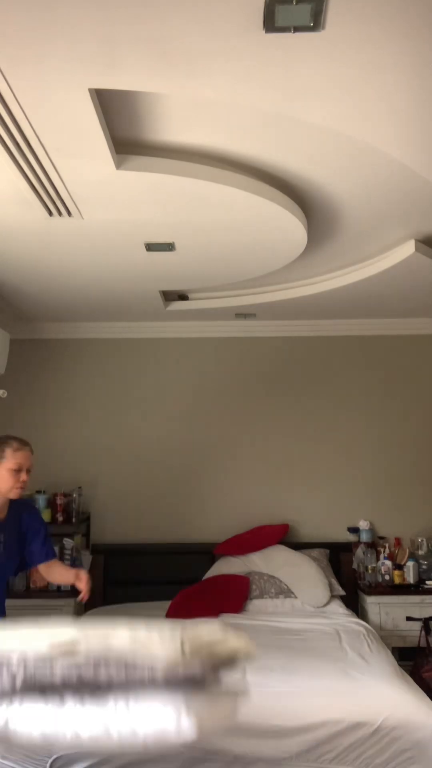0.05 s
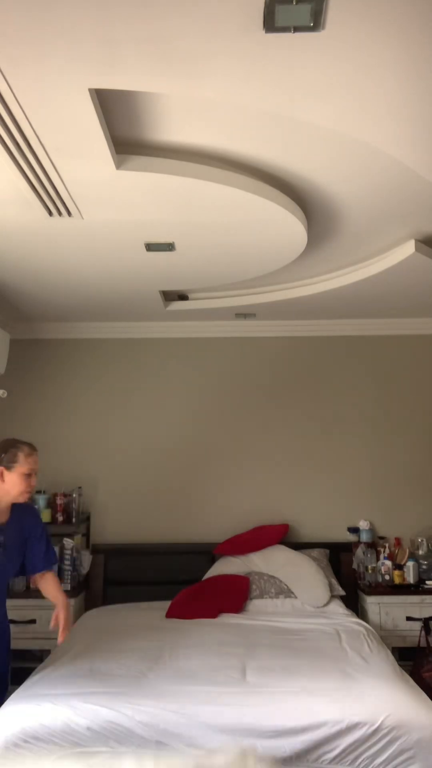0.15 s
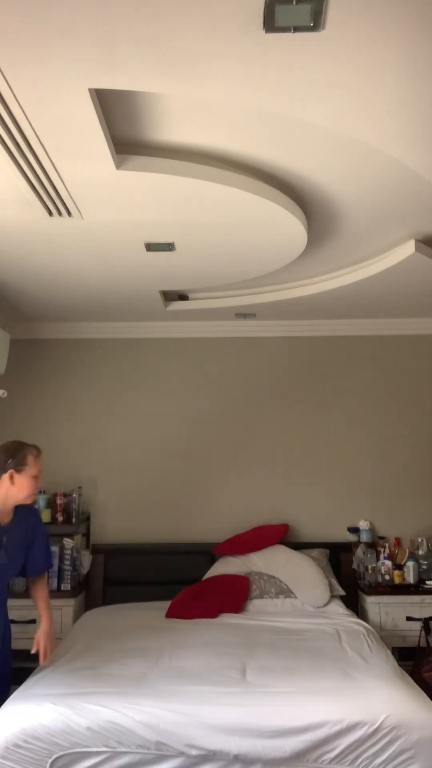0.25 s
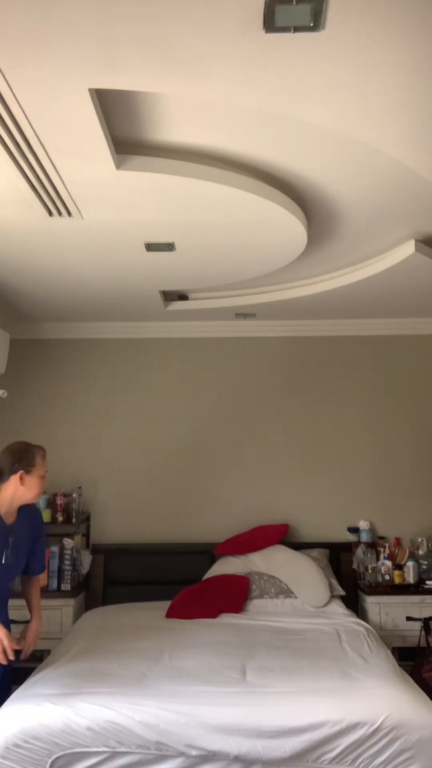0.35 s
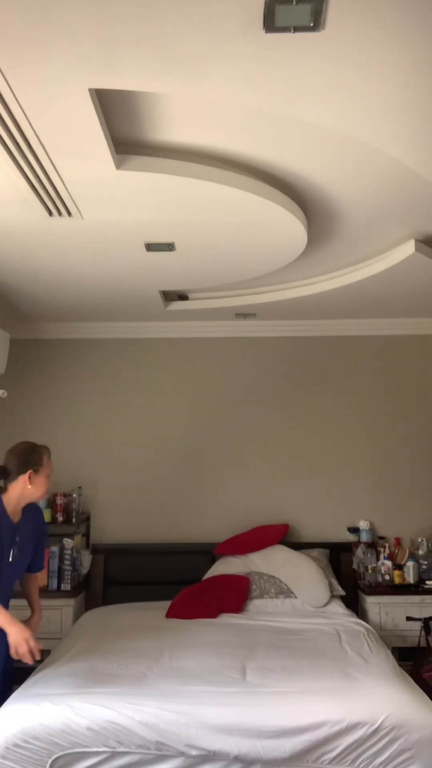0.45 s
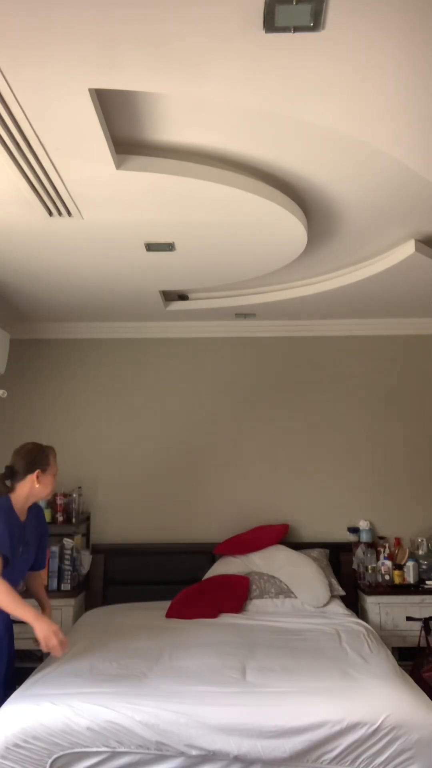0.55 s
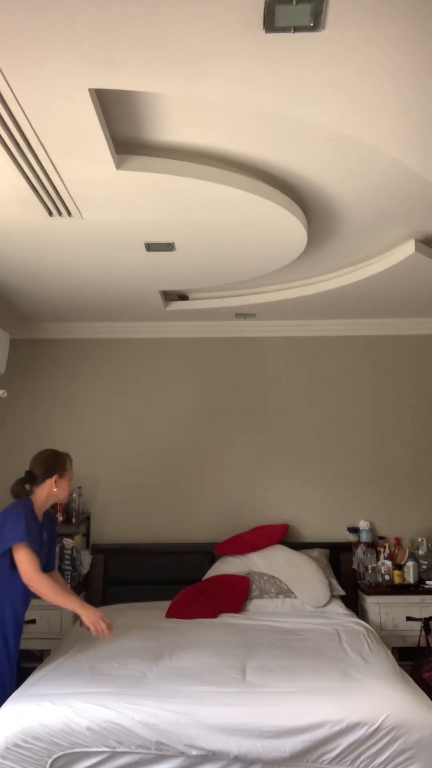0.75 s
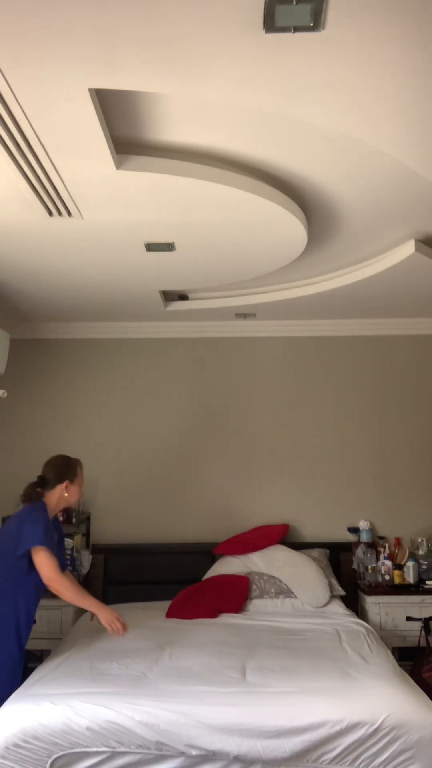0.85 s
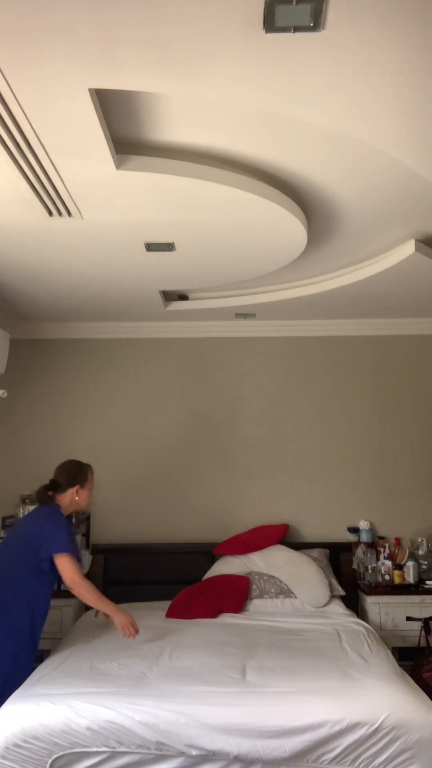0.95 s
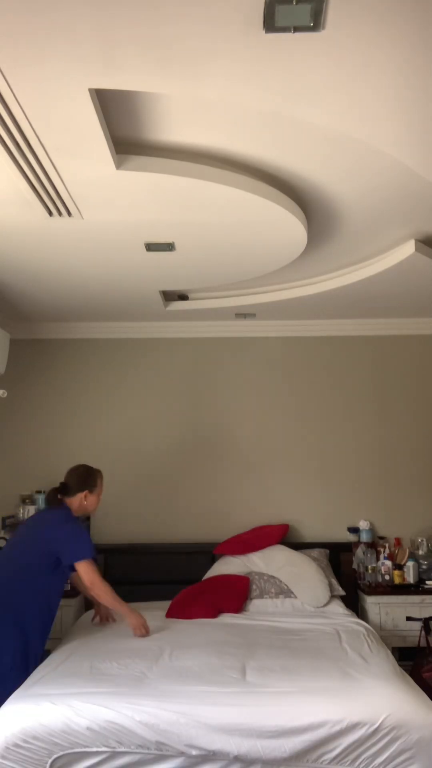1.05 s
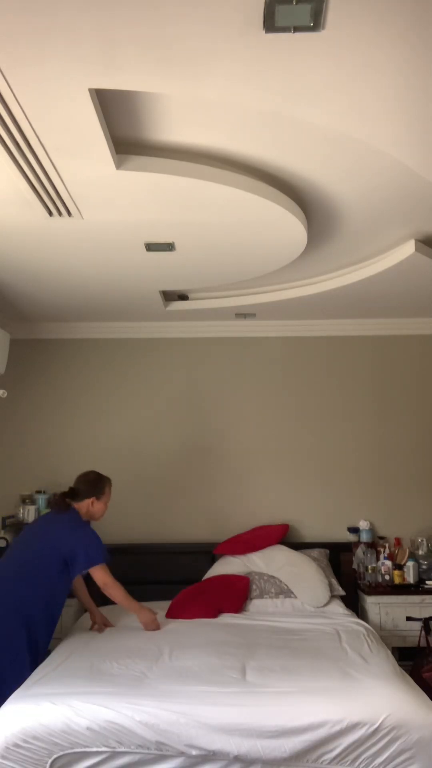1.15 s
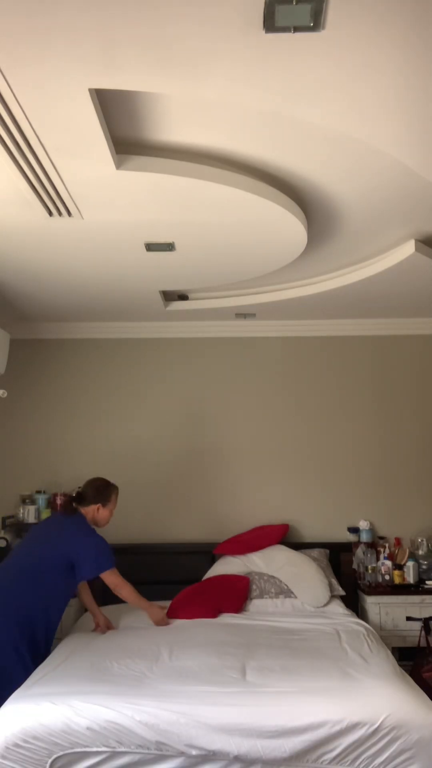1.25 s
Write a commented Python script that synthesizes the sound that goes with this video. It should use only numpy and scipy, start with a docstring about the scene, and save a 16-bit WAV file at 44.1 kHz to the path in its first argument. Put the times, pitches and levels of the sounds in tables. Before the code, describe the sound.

Bedding flops onto a mattress with a muffled, briefly booming thump in a quiet bedroom. The bed frame knocks faintly, then a hand slides over the sheet with a soft hiss, above a low ventilation hum.

```python
"""Faint mains hum and ventilation fill a quiet bedroom as a stack of folded bedding swishes through the air.
It flops onto a bed layer by layer: each impact excites the modes of bed base and mattress and
puffs air out through the cloth, and the room booms briefly. The bedding slumps; the frame knocks softly.
Then a hand sweeps over the sheet with a hiss of friction, and the weave zips lower as the hand slows."""
import sys
import numpy as np
from scipy import signal
from scipy.fft import rfft, irfft, next_fast_len
from scipy.io import wavfile
from scipy.ndimage import map_coordinates

SR = 44100
rng = np.random.default_rng(int(sys.argv[2]) if len(sys.argv) > 2 else 0)


def materialize(psi):
    """Save the field psi as 16-bit PCM at rate SR to the path in sys.argv[1].

    A 1-D psi becomes a single channel; in a 2-D psi each row is a channel.
    """
    bounded = np.clip(np.atleast_2d(psi).T, -1, 1)
    quanta = np.round(bounded * 32767).astype(np.int16)
    wavfile.write(sys.argv[1], SR, quanta)


N = 57330

# layers of the stack landing: start_s, push_db, puff_db, puff_rise_s
LANDINGS = [(0.2089, -32, -29, 0.0037), (0.2199, -26.5, -32.5, 0.016), (0.2439, -31.5, -30.5, 0.011),
            (0.2637, -22, -26.5, 0.0036), (0.2834, -28.5, -35, 0.018)]
LANDING_PAN_DB = -2.5  # left minus right


def amp(db):
    """Amplitude ratio of a level in decibels."""
    return 10 ** (np.asarray(db) / 20)


def unit(x):
    """Normalisation to rms 1."""
    return x / np.sqrt(np.mean(x ** 2) + 1e-20)


def pan(db):
    """Interchannel level difference as left and right gains."""
    return amp(np.array([[.5], [-.5]]) * db)


def along(points, hz):
    """Interpolation of (frequency_hz, value) points on a log frequency axis."""
    knots_hz, values = np.transpose(points)
    return np.interp(np.log(hz + 1), np.log(knots_hz + 1), values)


def since(start_s):
    """Elapsed seconds at each sample, zero before the start."""
    return np.maximum(np.arange(N) / SR - start_s, 0)


def curves(rows):
    """Linear interpolation in time of each column after the first."""
    times, *columns = np.transpose(rows)
    return [np.interp(since(0), times, column) for column in columns]


def wobble(knots_per_s):
    """Slow random modulation: a spline through Gaussian values."""
    return map_coordinates(rng.standard_normal(N // 8), [since(0) * knots_per_s], mode="wrap")


def filtered(x, response):
    """Linear filtering: the spectrum times a complex frequency response."""
    size = next_fast_len(N + SR // 2)
    hz = np.fft.rfftfreq(size, 1 / SR)
    return irfft(rfft(x, size) * response(hz), size)[..., :N]


def rush(spectrum):
    """Partially coherent stereo noise of rms 1, mixed from independent mid and side signals."""
    # likeness at the two microphones: frequency_hz, correlation
    coherence = [(60, 0.64), (230, 0.44), (500, .65), (1000, .65), (4000, 0.68), (8000, .7)]

    def response(hz):
        angle = np.arccos(np.clip(along(coherence, hz), -1, 1)) / 2
        return amp(along(spectrum, hz)) * [np.cos(angle), np.sin(angle)]
    mid, side = filtered(rng.standard_normal((2, N)), response)
    return unit(np.array([mid + side, mid - side]))


def cloth(spectrum, grain_db):
    """Stick-slip friction: fibres catch and release, making the noise grainy."""
    return unit(rush(spectrum) * amp(grain_db * wobble(knots_per_s=750)))


def narrowband(hz, width_hz):
    """Random quadrature modulation spreads a steady or gliding tone into a noise band of rms 1."""
    phase = 2 * np.pi * np.cumsum(hz * np.ones(N)) / SR
    return unit(wobble(width_hz) * np.cos(phase) + wobble(width_hz) * np.sin(phase))


def burst(start_s, rise_s, t60_s):
    """Transient envelope: a linear rise, then exponential decay."""
    attack = np.minimum(since(start_s) / rise_s, 1)
    return attack * np.exp(-np.log(1000) * since(start_s + rise_s) / t60_s)


def ring(start_s, hz, rise_s, t60_s):
    """Damped oscillation of one mode."""
    return burst(start_s, rise_s, t60_s) * np.sin(2 * np.pi * hz * since(start_s))


def mains_hum(waver_db=.8):
    """A motor's line spectrum, each partial wavering slightly in level."""
    # low partials: pitch_hz, level_db
    partials = [(59.2, -66.5), (97, -68), (119.6, -55)]
    # upper partials: pitch_hz, level_db
    overtones = [(237, -69), (296, -68)]
    # their swell toward the end: time_s, gain_db
    swell = [(0, -5.5), (.75, -7), (.9, 0.5), (1.3, 1)]

    def tone(hz, db):
        envelope = amp(db + waver_db * wobble(knots_per_s=6.2))
        return envelope * unit(np.sin(2 * np.pi * (hz * since(0) + rng.random())))
    low = sum(tone(hz, db) for hz, db in partials)
    high = sum(tone(hz, db) for hz, db in overtones)
    return low + amp(curves(swell)[0]) * high


def ventilation(air_db=-60):
    """Steady airflow gives broadband noise with a thin narrowband whine."""
    # bands of the whine: centre_hz, level_db, width_hz
    whine_bands = [(990, -83, 140), (1500, -89.5, 190), (2620, -89, 190), (4120, -80, 120)]
    # spectrum of the moving air: frequency_hz, relative_db
    air_spectrum = [(25, -10), (60, 1.5), (160, -7), (300, -13.5), (500, -23), (900, -33), (1800, -44.5),
                    (3300, -39.5), (4100, -30.5), (4800, -50), (6300, -42.5), (7600, -51), (11000, -43.5),
                    (13000, -75)]
    whine = sum(amp(db) * narrowband(hz, width) for hz, db, width in whine_bands)
    return whine + amp(air_db) * rush(air_spectrum)


def reverberation(x):
    """Diffuse field: convolution with a short decaying noise, different at each microphone."""
    # reverberation time of the bedroom: frequency_hz, t60_s
    decay_times = [(100, 0.77), (500, .36), (2000, 0.33), (8000, 0.46)]
    hz, t, noise = signal.stft(rng.standard_normal((2, SR // 2)), SR, nperseg=256)
    decay = np.exp(-np.log(1000) * t / along(decay_times, hz)[:, None])
    tail = signal.istft(noise * decay, SR, nperseg=256)[1]
    return signal.fftconvolve(x, tail / np.linalg.norm(tail[0]), axes=1)[:, :N]


def wall_reflections(x, count=9, span_s=0.027, level_db=-4):
    """Comb filtering: early reflections interfere with the direct sound above the bass."""
    delays = span_s * (np.arange(count) + rng.random(count)) / count
    gains = rng.choice([-1, 1], count) * np.exp(-delays / span_s)
    gains = amp(level_db) * gains / np.linalg.norm(gains)

    def response(hz):
        highpass = hz / np.hypot(hz, 400)
        echoes = gains @ np.exp(-2j * np.pi * np.outer(delays, hz))
        return (1 + highpass * echoes) / np.hypot(1, highpass * amp(level_db))
    return filtered(x, response)


def frame_knocks(rise_s=.012):
    """Shifting weight excites the bed frame's modes in faint knocks."""
    # shifts of weight: start_s, level_db
    nudges = [(0.501, -56), (.585, -62.5), (0.766, -60.5)]
    # modes of the frame: pitch_hz, gain_db, t60_s
    modes = [(61.4, 8, 0.24), (244.3, -1, 0.15), (415.5, -4, 0.054), (710, -12, 0.39)]
    return sum(amp(level + db) * ring(start, hz, rise_s, t60)
               for start, level in nudges for hz, db, t60 in modes)


def swish_and_settle():
    """Amplitude-modulated noise: air moves with the flying stack, and the bedding later slumps."""
    # the stack in flight: time_s, level_db
    swish = [(0, -64.5), (.06, -69), (.12, -74.5), (.17, -77.5), (.2, -55.5), (.23, -88.5)]
    # small soft slumps: start_s, level_db
    slumps = [(.45, -68), (0.538, -75.5), (0.766, -70)]
    # spectrum of both: frequency_hz, relative_db
    spectrum = [(150, -10), (350, 3), (700, -6.5), (1000, -10), (1550, -17), (2200, -23.5), (6000, -24.5),
                (7500, -48)]
    settling = sum(amp(db) * burst(start, rise_s=0.018, t60_s=0.42) for start, db in slumps)
    return (amp(curves(swish)[0]) + settling) * rush(spectrum)


def hand_sweep(grain_db=1.5):
    """Sliding friction hisses, then drags; the zip's pitch is the rate at which threads pass."""
    # the hand's stroke: time_s, hiss_db, drag_db
    stroke = [(.8, -100, -96), (.87, -78, -75.5), (.93, -95, -77), (.97, -75.5, -83.5),
              (1.042, -77.5, -69.5), (1.053, -57, -70), (1.115, -56, -63.5), (1.16, -64, -58.5),
              (1.21, -73.5, -60), (1.3, -71.5, -59.5)]
    # bright friction spectrum: frequency_hz, relative_db
    hiss_spectrum = [(700, -14.5), (1500, -11.5), (2100, -5.5), (2650, 5.5), (3200, -1.5), (4000, 2),
                     (6300, 6), (7000, -9.5), (7700, -22), (10000, -20), (12000, -56.5)]
    # duller friction spectrum: frequency_hz, relative_db
    drag_spectrum = [(60, 11.5), (250, 9), (500, -1), (800, -3), (1400, -6.5), (2100, -3.5), (2700, -4),
                     (3200, -5.5), (4000, -0.5), (6300, -26.5), (7300, -29), (11000, -40)]
    # threads passing under the hand: time_s, pitch_hz, level_db
    weave = [(1.1, 4400, -78), (1.135, 4300, -68), (1.17, 4850, -68), (1.205, 4400, -72),
             (1.232, 4150, -65), (1.256, 4000, -62), (1.266, 3520, -62), (1.3, 3420, -66)]
    hiss_db, drag_db = curves(stroke)
    weave_hz, weave_db = curves(weave)
    zip_started = since(weave[0][0]) > 0
    zipping = amp(weave_db) * narrowband(weave_hz, width_hz=200) * zip_started
    hiss = amp(hiss_db) * cloth(hiss_spectrum, grain_db)
    drag = amp(drag_db) * cloth(drag_spectrum, grain_db)
    return hiss + drag + zipping


def flop(grain_db=-1, t60_s=0.22):
    """Impact noise: cloth snaps and slaps on the sheet, and compression expels air from the layers."""
    # snap of the stack's leading edge: frequency_hz, relative_db
    snap_spectrum = [(400, -7), (1400, -5.5), (2700, 1), (3400, -11), (7000, -35.5), (8000, -49)]
    # air escaping through cloth: frequency_hz, relative_db
    puff_spectrum = [(30, -19), (70, 2), (150, -9), (220, 3.5), (320, -6.5), (430, -9), (680, -12.5),
                     (850, -18.5), (1400, -24.5), (2600, -41.5), (5000, -66.5)]
    # cloth meeting the sheet, lower layers first: start_s, level_db, rise_s
    contacts = [(0.205, -44, 0.0099), (0.244, -37.5, 0.017)]
    # spectrum of those slaps: frequency_hz, relative_db
    slap_spectrum = [(300, -3.5), (800, 0), (1400, 0), (2000, -6), (2600, -3.5), (3300, -9), (4600, -14.5),
                     (6300, -15.5), (7000, -29), (7700, -44.5), (11000, -49.5), (12500, -78)]
    snap = amp(-42) * burst(start_s=.2035, rise_s=.002, t60_s=0.033) * cloth(snap_spectrum, grain_db)
    puffs = sum(amp(db) * burst(start, rise, t60_s) * rush(puff_spectrum)
                for start, _, db, rise in LANDINGS)
    slaps = sum(amp(db) * burst(start, rise, t60_s) * cloth(slap_spectrum, grain_db)
                for start, db, rise in contacts)
    return snap + pan(LANDING_PAN_DB) * puffs + slaps


def thump(rise_cycles=0.66):
    """Modal response: each layer strikes the bed base; then the mattress gives and the room booms."""
    # modes of the bed base: pitch_hz, gain_db, t60_s
    base_modes = [(142, -4.5, 0.087), (197.1, 0.5, 0.16), (225.6, 1.5, 0.2), (266.7, -3, 0.13),
                  (299.8, 1, 0.089), (404.3, -13, 0.15), (519.4, -19.5, 0.15)]
    # the mattress's slow give and the room's lowest mode: pitch_hz, gain_db, t60_s
    boom_modes = [(74.8, -3, .3), (95, -9, 0.14), (69.8, -3, 0.57)]

    def struck(modes, lag_s):
        # low modes take longer to swell
        return sum(amp(push_db + db) * ring(start + lag_s, hz, rise_cycles / hz, t60)
                   for start, push_db, _, _ in LANDINGS for hz, db, t60 in modes)
    return pan(LANDING_PAN_DB) * struck(base_modes, lag_s=0) + struck(boom_modes, lag_s=0.0047)


def scene(reverb_db=-11.5):
    """Superposition at two microphones, the left one reached a little earlier."""
    # level difference: frequency_hz, left_minus_right_db
    balance = [(60, -1.7), (130, 0), (250, -1.5), (500, -2), (1000, 0.5), (2000, -1), (5000, 0)]
    # phase difference: frequency_hz, left_lead_rad
    lead = [(20, 0), (150, .1), (400, .5), (850, 2.3), (1500, 1.6), (2200, 1.8), (3000, 2.6), (4000, 3.1),
            (4800, 3.4), (6400, 5.1), (7300, 6.4), (11500, 9.4)]

    def microphones(hz):
        phase = np.array([[.5], [-.5]]) * along(lead, hz)
        return pan(along(balance, hz)) * np.exp(1j * phase)
    fabric = wall_reflections(flop() + swish_and_settle() + hand_sweep())
    reverb = amp(reverb_db) * reverberation(fabric)
    background = mains_hum() + ventilation()
    return filtered(background + reverb + frame_knocks() + fabric + thump(), microphones)


def record(dry, cutoff_hz=12500):
    """Band limiting: an ideal low-pass removes the highest treble."""
    return filtered(dry, lambda hz: hz < cutoff_hz)


dry = scene()
out = record(dry)
materialize(out)
```